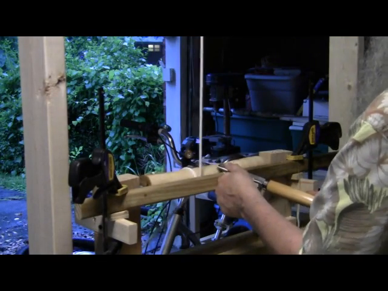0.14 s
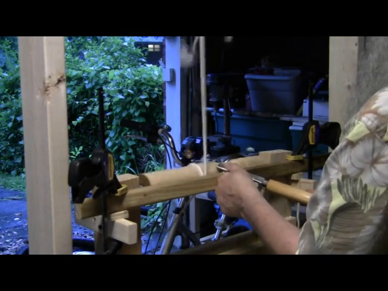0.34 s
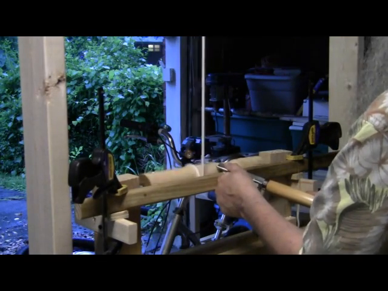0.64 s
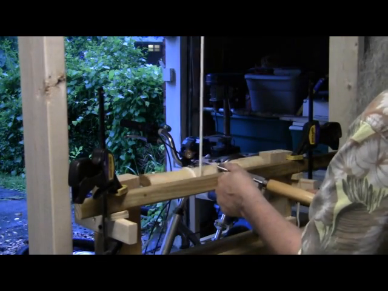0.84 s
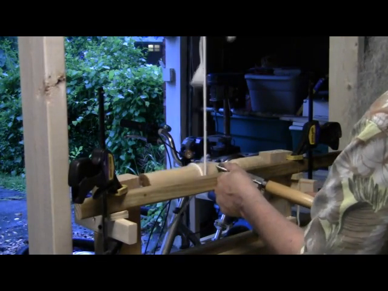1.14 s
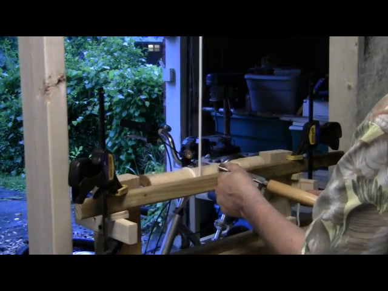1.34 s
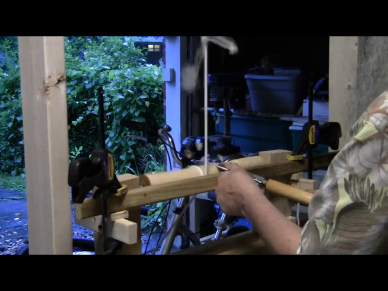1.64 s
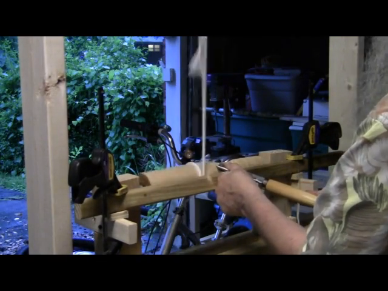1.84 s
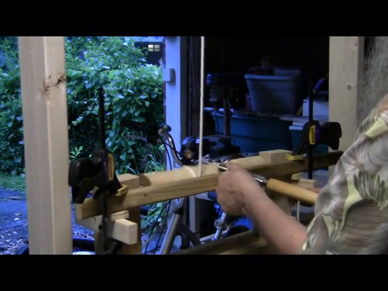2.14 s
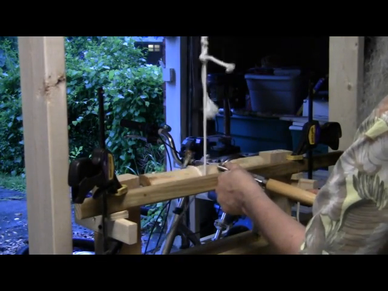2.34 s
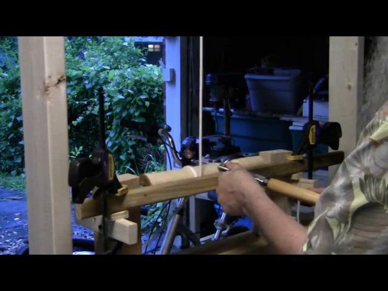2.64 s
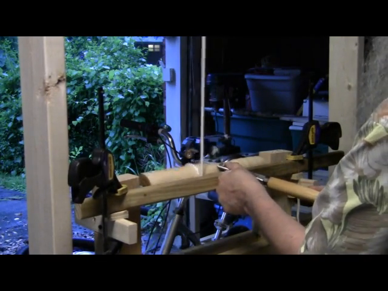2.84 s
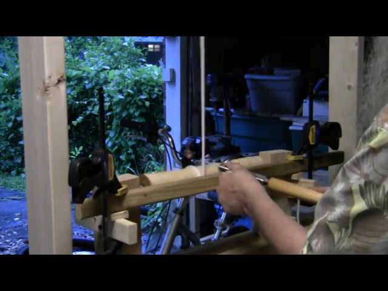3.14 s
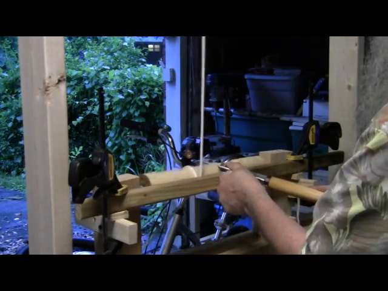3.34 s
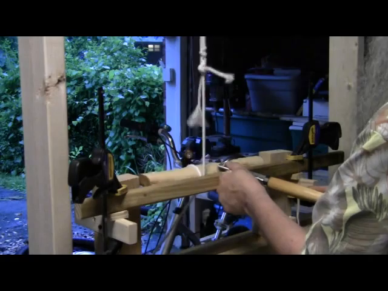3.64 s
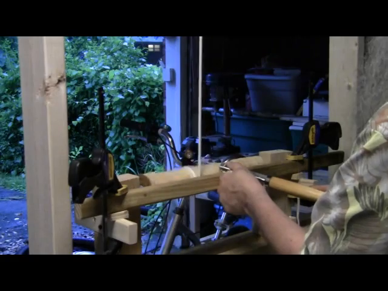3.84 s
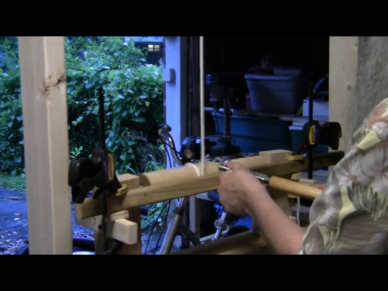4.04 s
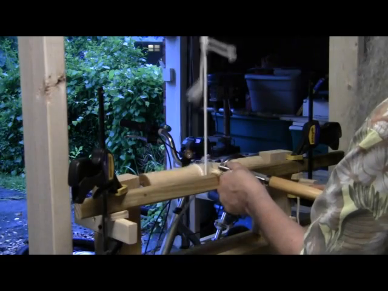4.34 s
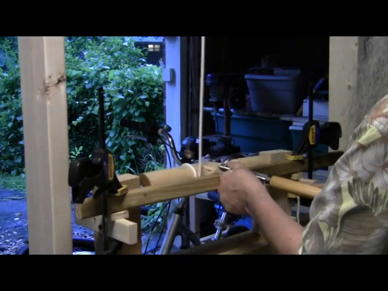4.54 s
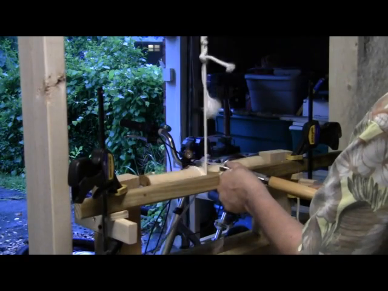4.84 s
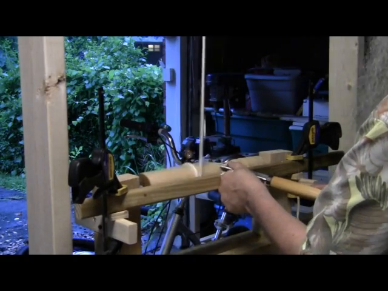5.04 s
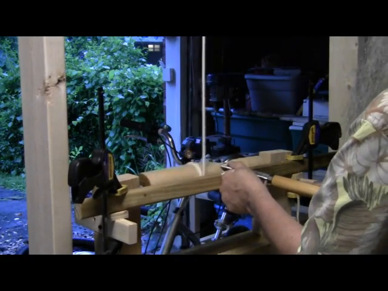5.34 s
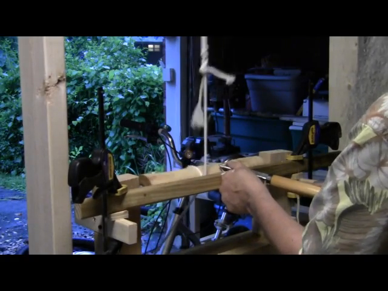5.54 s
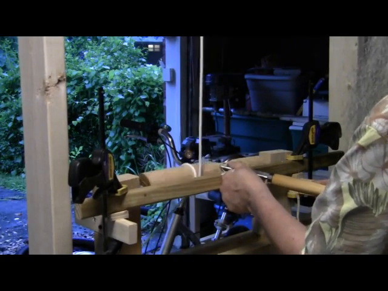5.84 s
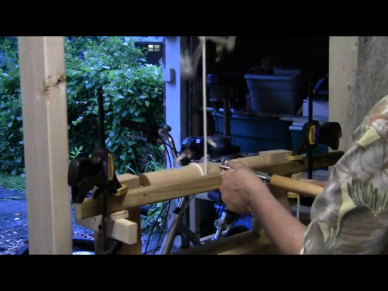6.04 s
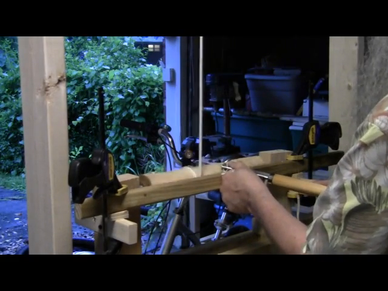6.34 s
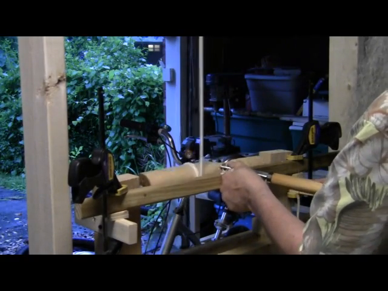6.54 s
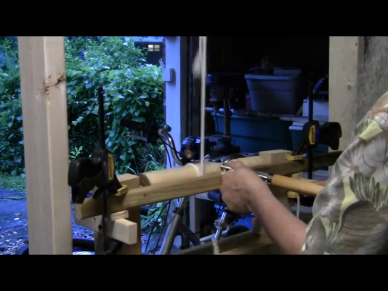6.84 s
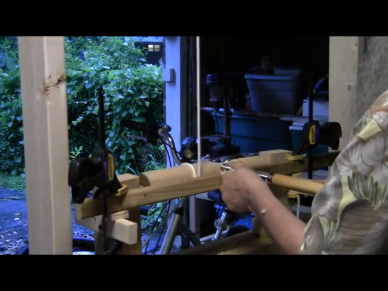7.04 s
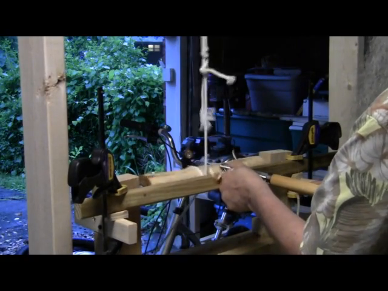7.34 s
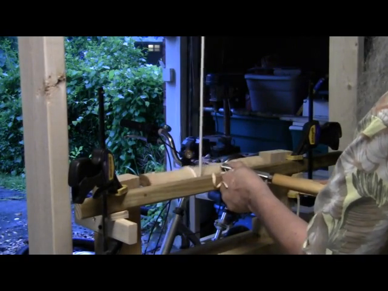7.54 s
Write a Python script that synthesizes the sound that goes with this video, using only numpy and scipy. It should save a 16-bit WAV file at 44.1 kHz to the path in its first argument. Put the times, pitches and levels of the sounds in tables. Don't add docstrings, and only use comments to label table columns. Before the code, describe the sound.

Short, woody tearing scrapes repeat about every 0.6 seconds on a cord-driven lathe, ticking and knocking between strokes, quiet yard noise behind.

```python
import sys
import numpy as np
from scipy import signal
from scipy.fft import rfft, irfft
from scipy.io import wavfile
from scipy.ndimage import uniform_filter1d

SR = 44100
rng = np.random.default_rng(int(sys.argv[2]) if len(sys.argv) > 2 else 0)


def unload_audio(sound):
    columns = np.transpose(np.atleast_2d(sound))
    steps = np.round(np.clip(columns, -1, 1) * 32767)
    wavfile.write(sys.argv[1], SR, steps.astype(np.int16))


def volts_from_db(level):
    exponent = np.asarray(level, float) / 20
    return 10 ** exponent


N = 339570

# freq_hz, density_db_per_hz
YARD_SPECTRUM = [(15, -51), (25, -42), (114, 6.5), (156, -7), (433, -5), (712, -4), (1050, -8.5),
                 (1400, -13), (1850, -12.5), (2250, -20), (2900, -22), (9010, -32.5), (12000, -37),
                 (13000, -46)]
# freq_hz, likeness
LIKENESS = [(60, 1), (230, 0.96), (870, 0.87), (3300, 0.76), (10000, 0.72), (11200, 0.13)]
# time_s, pitch_hz, level_db
MOTOR_TONE = [
    (0, 106.8, -51),
    (1, 107, -55.5),
    (2, 108, -59),
    (3.1, 106.5, -50.5),
    (4.1, 104.5, -48),
    (4.7, 104.2, -45),
    (5.5, 104.8, -47.5),
    (6, 105.3, -59.5),
    (6.5, 105.5, -46),
    (7.7, 105.9, -54),
]
# start_s, length_s, start_hz, end_hz, level_db
MOTOR_SWELLS = [(0, 4.3, 232.7, 230, -61), (4.38, .5, 228, 228, -48), (5.0, .55, 229, 229, -48),
                (5.6, .6, 230, 230, -54), (6.3, .8, 231.5, 233.5, -43), (7.15, .8, 234, 237, -47),
                (4.5, .85, 271, 270, -55), (6.15, .95, 273, 276, -51), (7.25, .6, 278, 280, -53),
                (6.75, .95, 339, 339, -48), (4.05, .9, 146, 142, -53)]
# freq_hz, t60_s
ROOM_DECAY = [(250, 0.28), (700, 0.31), (2000, 0.36), (5000, 0.39), (11000, 0.089)]

# start_s, peak_db
CORD_TICKS = [(0.1146, -35.5), (0.7352, -30), (0.756, -34), (2.0124, -35.5), (2.555, -34.5), (2.603, -33),
              (2.6429, -32), (2.667, -32), (3.2085, -33.5), (3.271, -30), (3.9039, -29), (3.929, -30.5),
              (4.5143, -29.5), (4.5439, -32), (5.0815, -34.5), (5.128, -32.5), (5.152, -33.5),
              (5.5288, -27), (6.4263, -31), (6.9426, -28.5), (7.0084, -31), (7.03, -30), (7.568, -35.5),
              (7.6299, -37)]
FAINT_CORD_TICKS = [0.1804, 1.256, 1.3344, 1.3594, 1.924, 1.957, 2.196, 4.568, 5.283, 5.482, 6.324, 6.906]
FAINT_TICK_DB = -41
# start_s, peak_db, pitch_hz
FRAME_KNOCKS = [(0.738, -29, 681), (2.012, -33, 417), (2.131, -18.5, 990), (2.17, -20, 750),
                (2.209, -32, 748), (5.483, -22, 510), (5.533, -23, 1000), (5.55, -20.5, 930),
                (5.71, -20, 587), (5.721, -30, 300), (5.737, -18.5, 308), (5.923, -45, 730),
                (5.937, -21, 324), (0.13, -23, 710), (6.944, -18, 1350), (7.163, -29, 1550)]
# start_s, peak_db, brightness_db, buzz_share
REST_TAPS = [(.624, -46, 8, .05), (.663, -45, 8, .3), (.8555, -32, 5, .25), (3.14, -41, 8, .1),
             (3.803, -42, 6, .1), (5.709, -47, 6, .3), (5.7828, -29, 1, .25), (6.2125, -33, 8, .05),
             (6.9244, -39, 8, .05), (7.085, -42, 8, .05), (7.162, -36, -8, .3), (7.225, -40, 6, .05)]
# freq_hz, width_hz, level_db, brightness_share
STEEL_MODES = [(2380, 250, -4, 0), (3500, 400, -1, 0), (5800, 700, -6, 0.83), (7300, 800, -6, 1),
               (8900, 480, -3, 1), (11000, 1900, -16, 1)]

# start_s, length_s, hiss_db, wood_start_db, wood_end_db
RETURN_STROKES = [(0.0, 0.23, -40, -40, -50), (0.689, 0.21, -38.5, -57, -34.5),
                  (1.32, 0.14, -41.5, -45, -56), (1.929, 0.3, -42.5, -55, -33.5),
                  (2.552, 0.24, -36, -41, -70), (3.172, 0.44, -41, -47, -53),
                  (3.878, 0.16, -39.5, -46, -55), (4.5, 0.26, -42, -44.5, -53),
                  (5.068, 0.89, -41.5, -44, -55), (5.749, 0.14, -35.5, -42, -61),
                  (6.312, 0.27, -43, -42.5, -56), (7.08, 0.14, -43, -48, -37),
                  (7.564, 0.22, -37.5, -40.5, -47)]
RUB_RISE_S, RUB_IN_DB, RUB_FALL_DB_PER_S = 0.099, 1, 38
# start_s, rise_s, wood_db, blade_over_wood_db, hiss_over_wood_db
EDGE_BITES = [(0.383, 0.01, -31, -5, -3.5), (0.46, 0.021, -32.5, -9.5, -8.5),
              (1.027, 0.03, -27.5, -11, -8.5), (1.114, 0.03, -25.5, -11.5, -11.5),
              (1.663, 0.028, -21.5, -15, -11), (1.736, 0.0033, -25, -9, -11.5),
              (2.311, 0.017, -29.5, -8, -0.5), (2.369, 0.027, -27, -7.5, -7.5),
              (2.908, 0.05, -18, -8, -14.5), (3.539, 0.037, -37, -5, -2), (3.599, 0.036, -30.5, -14, -9),
              (4.162, 0.036, -26, -4, -7), (4.792, 0.02, -19.5, -9.5, -9.5),
              (6.068, 0.028, -19, -13.5, -11.5), (6.685, 0.03, -27.5, -8, -6.5),
              (7.276, 0.07, -29.5, -2.5, -6)]
# start_s, rise_s, wood_db, blade_over_wood_db, hiss_over_wood_db
EDGE_SOFT_CONTACTS = [(0.942, 0.014, -42, 1, -4), (2.238, 0.018, -42, -5.5, -9), (2.84, 0.015, -48, 2.5, -3.5),
                      (4.099, 0.01, -40, -19, -11.5), (4.72, 0.051, -42.5, -12, -7), (5.516, 0.013, -46.5, -2, -3),
                      (5.876, 0.043, -38.5, -7, -14), (5.973, 0.063, -29, -10, -10),
                      (6.623, 0.011, -40, 1.5, -4.5), (6.941, 0.0053, -43, 3, -4.5), (7.225, 0.029, -43, -9, -5)]
BITE_IN_DB, GRAZE_IN_DB = 13, 12
DIES_DB, GRAZE_FALL_DB_PER_S = 27, 153
EARLY_BLADE_DB, EARLY_HISS_DB, LATE_BLADE_DB, LATE_HISS_DB = 8, 9, -4.5, -7
SETTLED_HZ = 843
# start_s, blade_main_over_others_db, shank_db, fall_db_per_s, bed_over_wood_db
HAND_GRIPS = [(0, 12, -3.5, 148, -11.5), (.9, 6, -3.5, 163, -8.5), (1.6, 4, 2, 167, -23.5),
              (2.2, 2, -1, 195, -15.5), (2.8, -12, 0, 147, -19.5), (3.5, -8, -1, 186, -20),
              (4.05, -2, 1, 130, -16.5), (4.7, -5, -1, 120.5, -22), (5.4, -6, -0.5, 120, -13),
              (6.06, -17, -4.5, 148, -21), (6.5, -6, -1.5, 110, -11), (7.2, -17, 1, 131, -14)]
# start_s, wood_region_hz, unfocused_share, upper_wood_db
SPINDLE_PLACES = [(0, 1010, 1, -5), (.9, 950, 1, -4), (1.6, 866, 0.077, 4.5), (2.2, 930, .99, -2.5),
                  (2.8, 1080, 0.33, -3), (3.5, 935, 0.98, -14), (4.05, 1090, 0.69, 7.5),
                  (4.7, 1150, 0.46, 6.5), (5.4, 810, 1, -10), (6.06, 940, 1, 4), (6.5, 920, 0.92, -0.5),
                  (7.2, 1450, .99, -0.5)]
# time_s, boost_db
GRAIN_CATCHES = [(0.387, 5.5), (0.466, 10.5), (0.491, 5.5), (.96, 1.5), (1.04, 8.5), (1.126, 6),
                 (1.151, -2.5), (1.184, -1.5), (1.678, 4.5), (1.692, 2), (1.747, 0.5), (2.328, 0),
                 (2.402, -1), (2.925, 7.5), (2.95, 2.5), (2.969, -7), (2.994, 0.5), (3.556, 7.5),
                 (3.616, 5.5), (4.175, 4.5), (4.754, 7.5), (4.826, 1), (4.937, 3.5), (6.078, 3),
                 (6.104, 2.5), (6.633, 3), (6.698, 2.5), (6.718, -2), (7.296, -0.5), (7.320, 5)]
# time_s, boost_db
SHAVING_SPITS = [(.389, 4.5), (.465, 3), (.476, 4.5), (.4894, 4), (1.0406, 0.5), (1.055, 2), (1.0685, 3),
                 (1.121, 0), (1.1288, 3), (1.1492, 2.5), (1.183, 3), (1.69, -7), (1.7435, 4), (1.7906, -1),
                 (1.757, -6), (2.3237, 0.5), (2.3839, 1), (2.912, -3), (2.9887, 2), (3.5614, 0.5),
                 (4.1707, 3.5), (4.2007, 2), (4.243, 8), (4.806, 1.5), (4.9, 5), (6.0254, 5.5), (6.09, 2),
                 (6.13, 0), (6.655, 7), (6.725, 1.5), (6.77, 5), (7.2521, 8), (7.2791, -1.5), (7.2955, 4),
                 (7.335, -6)]
# start_s, length_s, pitch_hz, level_db
EDGE_CHATTER = [(0.403, 0.015, 2260, -30.5), (0.462, .014, 2246, -32), (0.475, 0.0088, 2260, -29),
                (0.5, 0.015, 2260, -36), (0.531, .016, 2260, -35.5), (0.552, 0.026, 2260, -40.5),
                (1.154, 0.023, 2230, -33), (1.036, 0.03, 2260, -24.5), (1.669, 0.036, 2260, -20.5),
                (2.319, 0.032, 2260, -22), (2.91, 0.011, 2130, -24), (4.161, .012, 3690, -30.5),
                (4.169, 0.039, 2280, -24), (4.789, 0.01, 2430, -33), (4.799, 0.016, 1250, -26),
                (7.288, 0.013, 5250, -31.5), (7.294, 0.016, 3620, -32.5), (7.306, 0.029, 1962, -24.5)]
# start_s, length_s, pitch_hz, peak_db
SPINDLE_SURGES = [(0.394, 0.0058, 970, -18), (0.411, 0.0076, 955, -20), (0.4677, 0.0058, 855, -22),
                  (0.496, 0.0047, 880, -25), (1.039, 0.0041, 875, -18), (1.0477, 0.0068, 800, -18),
                  (1.1244, 0.0048, 886, -22), (1.132, 0.0066, 944, -19), (1.1536, 0.0096, 812, -20.5),
                  (1.6866, 0.0073, 880, -12), (1.702, 0.0041, 890, -15), (1.712, 0.0058, 836, -10),
                  (1.723, 0.0075, 893, -20), (1.755, 0.0044, 850, -21), (2.413, 0.0042, 735, -23),
                  (2.4343, 0.007, 770, -23), (2.927, 0.0098, 1100, -13.5), (2.9469, 0.0069, 1116, -6.5),
                  (2.9608, 0.0079, 1035, -14), (2.9668, 0.0039, 1067, -9), (2.988, 0.0081, 1012, -8),
                  (3.015, 0.0089, 1041, -22), (3.052, 0.0054, 947, -28), (3.6342, 0.0031, 880, -26),
                  (3.642, 0.0039, 822, -18), (4.183, 0.0042, 1080, -18), (4.2, 0.0039, 980, -23),
                  (4.8053, 0.0057, 1210, -9), (4.814, 0.0046, 1120, -19), (4.832, 0.0073, 1070, -18),
                  (4.8433, 0.007, 1100, -18), (4.8481, 0.007, 1030, -13), (4.876, 0.0038, 1043, -17),
                  (4.8958, 0.0076, 1030, -20), (6.039, 0.0034, 843, -20), (6.061, 0.0064, 734, -17),
                  (6.079, 0.0064, 821, -13), (6.0854, 0.0081, 824, -15.5), (6.1, 0.0037, 885, -10),
                  (6.1, 0.0074, 950, -14), (6.1101, 0.012, 921, -20), (6.1202, 0.0048, 910, -19),
                  (6.1255, 0.0057, 820, -10), (6.184, 0.0063, 800, -21), (6.693, 0.014, 953, -19),
                  (6.762, 0.0067, 917, -20), (7.307, 0.0047, 1249, -16), (7.3105, 0.0042, 1310, -20)]
# start_s, length_s, pitch_hz, peak_db
BED_THUMPS = [(0.413, 0.018, 295, -27), (0.507, 0.017, 249, -29), (1.063, 0.035, 276, -27),
              (1.133, 0.023, 290, -31), (1.157, 0.035, 304, -26), (1.198, 0.023, 290, -35),
              (2.408, 0.023, 304, -34), (3.009, 0.033, 276, -35), (5.932, 0.039, 340, -30),
              (6.03, 0.025, 360, -28), (6.064, 0.018, 329, -27), (6.091, 0.018, 390, -34),
              (6.114, 0.012, 400, -26), (6.709, 0.034, 286, -36), (6.755, 0.014, 278, -31),
              (6.797, 0.02, 260, -32), (7.342, 0.023, 293, -29)]

# freq_hz, width_hz, level_db
WOOD_MODES = [(427, 26, -5), (450.6, 11.7, 1.5), (542, 58, 2.5), (670, 49, 0.5), (740, 86, -3),
              (876, 54, -5.5), (932, 49, -2), (1001, 95, -2.5), (1066, 35.6, -1.5), (1116, 12, -4),
              (1234, 78, -2)]
# freq_hz, width_hz, level_db
WOOD_UPPER_MODES = [(1350, 17, 0), (1440, 33, 1.5), (1567, 20, 3), (1671, 48, 10), (1887, 220, 6.5),
                    (1920, 110, 4)]
# freq_hz, width_hz, level_db
BLADE_MAIN_MODE = [(2260, 66, 0)]
# freq_hz, width_hz, level_db
BLADE_MODES = [(2072, 120, 8.5), (2373, 43, 18), (2516, 250, 5), (2760, 29, -13)]
# freq_hz, width_hz, level_db
BLADE_HIGH_MODES = [(5040, 70, -3), (5660, 60, 11.5), (7060, 240, 1.5), (9650, 270, 6.5)]
# freq_hz, width_hz, level_db
SHANK_MODES = [(3070, 33, -20), (3570, 210, 4), (3890, 120, -3)]
# freq_hz, density_db_per_hz
TEAR_SPECTRUM = [(880, -23), (1500, 13.5), (2100, -11.5), (2270, -4.5), (2950, -13), (8980, -17),
                 (12200, -30), (13000, -38)]

# freq_hz, level_db
SCATTER_SPECTRUM = [(300, -22), (2000, -51.5), (5000, -18.5), (10000, -12), (12000, -1)]
# freq_hz, gain_db
CAPSULE_RESPONSE = [(20, -33), (45, -3), (60, 0.5), (11000, -0.5), (11700, -5), (12350, -3.5), (12550, -14)]
# freq_hz, left_over_right_db
PORT_BIAS = [(60, .4), (300, 1.9), (1100, 2.1), (2700, .8), (5900, .9), (7300, -1), (10600, -1.8),
             (12100, -7.4)]
# freq_hz, left_lead_rad
PORT_LEAD = [(300, 0), (3000, -.12), (6000, -.42), (10400, -.52), (11400, -1.6), (12100, -2.8)]


def evened(x):
    return x / np.sqrt(np.mean(x ** 2) + 1e-20)


def read(points, hz):
    f, value = np.transpose(points)
    return np.interp(np.log(hz + 1), np.log(f + 1), value)


def resonate(x, hz, width_hz):
    turn = np.exp(2j * np.pi * np.cumsum(hz * np.ones(len(x))) / SR)
    r = np.exp(-np.pi * width_hz / SR)
    return 2 * (turn * signal.lfilter([1 - r], [1, -r], x / turn)).real


def resonate_twice(x, hz, width_hz):
    return resonate(resonate(x, hz, width_hz), hz, width_hz)


def ring(x, modes):
    total = np.zeros(len(x))
    for k, (hz, width_hz, db) in enumerate(modes):
        b, a = signal.iirpeak(hz, hz / width_hz, SR)
        total += (-1) ** k * volts_from_db(db) * signal.lfilter(b, a, x)
    return evened(total)


def colour(x, db):
    return irfft(rfft(x) * volts_from_db(db), N)


def flutter(samples, depth_db):
    size = max(int(samples), 2)
    smooth = uniform_filter1d(uniform_filter1d(rng.standard_normal(N), size), size)
    return volts_from_db(depth_db * evened(smooth))


def follow(db, size, origin):
    return uniform_filter1d(volts_from_db(db), size=size, origin=origin)


def controls(tables, rest):
    t, out = np.arange(N) / SR, np.repeat(np.array(rest, float)[:, None], N, 1)
    for rows in tables:
        s, *columns = np.transpose(rows)
        on = slice(round(s[0] * SR), round(s[-1] * SR))
        out[:, on] = [np.interp(t[on], s, c) for c in columns]
    return out


def by_stroke(rows, s):
    start, *columns = np.transpose(rows)
    row = np.maximum(np.searchsorted(start, s, "right") - 1, 0)
    return [c[row] for c in columns]


def yard():
    frames, hz = N // 256 + 5, np.fft.rfftfreq(1024, 1 / SR)
    a, b, c, d, patches = rng.standard_normal((frames, 513, 5)).T
    patches = uniform_filter1d(patches, size=10, axis=0)
    patches = evened(uniform_filter1d(patches, size=16, axis=1))
    same = np.clip(read(LIKENESS, hz) - .02, -1, 1)[:, None]
    left = a + 1j * b
    z = np.array([left, same * left + np.sqrt(1 - same ** 2) * (c + 1j * d)])
    z *= volts_from_db(read(YARD_SPECTRUM, hz)[:, None] + 2.4 * patches)
    noise = signal.istft(z, nperseg=1024, noverlap=768)[1][:, :N]
    return volts_from_db(-44.0) * evened(noise)


def motor_tone(hz):
    return np.sqrt(2) * flutter(6000, 1.07) * np.sin(2 * np.pi * np.cumsum(hz) / SR)


def drone():
    t = np.arange(N) / SR
    s, hz, db = np.transpose(MOTOR_TONE)
    out = volts_from_db(np.interp(t, s, db)) * motor_tone(np.interp(t, s, hz))
    for s, length, a_hz, b_hz, db in MOTOR_SWELLS:
        swell = np.clip(np.minimum(t - s, s + length - t) / .07, 0, 1)
        out += volts_from_db(db) * swell * motor_tone(np.interp(t, [s, s + length], [a_hz, b_hz]))
    return out


def shop(x):
    echoes = np.zeros((2, SR // 2))
    at = np.arange(200, SR // 2 - 20, 20) + rng.integers(0, 20, (2, (SR // 2 - 201) // 20))
    np.put_along_axis(echoes, at, rng.choice([-1., 1.], at.shape), 1)
    hz, t, z = signal.stft(echoes, SR, nperseg=256)
    same = np.clip(read(LIKENESS, hz) - .05, -1, 1)[:, None]
    z[1] = same * z[0] + np.sqrt(1 - same ** 2) * z[1]
    decay = volts_from_db(-60 * t / read(ROOM_DECAY, hz)[:, None])
    tail = signal.istft(z * decay, SR, nperseg=256)[1]
    return signal.fftconvolve(x[None], tail / np.linalg.norm(tail[0]), axes=1)[:, :N]


def knocks():
    out, t = np.zeros(N + 4000), np.arange(4000) / SR
    shape = (1 - np.exp(-t / 0.0006)) * np.exp(-t / 0.012)
    for (s, db, hz), push in zip(FRAME_KNOCKS, rng.standard_normal((len(FRAME_KNOCKS), len(t)))):
        rattle = evened(resonate_twice(push, hz, 590)) * shape
        out[round(s * SR) - 40:][:len(t)] += volts_from_db(db - 15) * rattle
    return out[:N]


def ticks():
    out, t = np.zeros(N + 2000), np.arange(2000) / SR
    rows = CORD_TICKS + [(s, FAINT_TICK_DB) for s in FAINT_CORD_TICKS]
    grit, pitch = rng.standard_normal((len(rows), 2, len(t))), rng.uniform(0.93, 0.98, len(rows))
    chirp_shape = (t / .004) ** 1.5 * np.exp(-(t / .0055) ** 4)
    burst_shape = (1 - np.exp(-t / .0003)) * np.exp(-(t / .0045) ** 2)
    tap_shape = (t / .004) * np.exp(-(t / .007) ** 2)
    for (s, db), (fizz, push), share in zip(rows, grit, pitch):
        sweep_hz = 3100 * share + 6000 * np.exp(-t / .0015)
        chirp = np.sin(2 * np.pi * np.cumsum(sweep_hz) / SR) * chirp_shape
        burst = evened(resonate_twice(fizz, 5800, 5000)) * burst_shape
        tap = evened(resonate_twice(push, 2000, 2200)) * tap_shape
        snap = .65 * chirp + .55 * burst + .6 * tap
        out[round(s * SR) - 40:][:len(t)] += volts_from_db(db - 3.0) * snap
    return out[:N]


def taps():
    out, t = np.zeros(N + 4000), np.arange(4000) / SR
    pushes = rng.standard_normal((len(REST_TAPS), len(t)))
    for (s, db, bright_db, buzz_share), push in zip(REST_TAPS, pushes):
        buzz = push * (np.exp(-t / .002) + buzz_share * np.exp(-t / .022))
        rung = np.zeros(len(t))
        for hz, width_hz, mode_db, share in STEEL_MODES:
            gain = volts_from_db(mode_db + share * bright_db) * np.sqrt(1000 / width_hz)
            rung += gain * resonate(buzz, hz, width_hz)
        out[round(s * SR) - 10:][:len(t)] += volts_from_db(db) * rung / abs(rung).max()
    return out[:N]


def chatter():
    out = np.zeros(N)
    pushes = rng.standard_normal((len(EDGE_CHATTER), 2, 6000))
    for (s, length, hz, db), push in zip(EDGE_CHATTER, pushes):
        u = np.arange(6000) / SR / length
        wobble, throb = evened(uniform_filter1d(push, size=90))
        shape = volts_from_db(db + 2.0 + 3.1 * throb) * np.sin(np.pi * np.minimum(u, 1)) ** .5
        phase = 2 * np.pi * np.cumsum(hz * (1 + .03 * wobble)) / SR
        out[round(s * SR):][:6000] += shape * np.sin(phase)
    return out


def surges(rows):
    out, hush = np.zeros(N), np.ones(N)
    for (s, length, hz, db), turn in zip(rows, rng.random(len(rows))):
        t = np.arange(0, length, 1 / SR)
        shape = np.sin(np.pi * (t / length) ** 1.77)
        at = slice(round(s * SR), round(s * SR) + len(t))
        out[at] += volts_from_db(db - 2.5) * shape * np.sin(2 * np.pi * (hz * t + turn))
        hush[at] *= 1 - .65 * shape
    return out, hush


def returns():
    tables = []
    for s, length, db, a_db, b_db in RETURN_STROKES:
        tables.append([(s, a_db, db - RUB_IN_DB),
                       (s + RUB_RISE_S, a_db, db),
                       (s + length, b_db, db - RUB_FALL_DB_PER_S * length)])
    return controls(tables, [-120, -120])


def cuts():
    rows = sorted([(*r, True) for r in EDGE_BITES] + [(*r, False) for r in EDGE_SOFT_CONTACTS])
    next_s = [r[0] for r in rows[1:]] + [N / SR]
    tables = []
    for (s, rise, db, blade_db, hiss_db, deep), after in zip(rows, next_s):
        in_db, fall, hz = GRAZE_IN_DB, GRAZE_FALL_DB_PER_S, SETTLED_HZ
        if deep:
            in_db, fall, hz = BITE_IN_DB, by_stroke(HAND_GRIPS, s)[2], by_stroke(SPINDLE_PLACES, s)[0]
        top = min(s + rise, after - .002)
        gone = min(fall * (after - top) / DIES_DB, 1)
        soon = min(4 * gone, 1)
        tables.append([(s, db - in_db, blade_db + deep * EARLY_BLADE_DB, hiss_db + deep * EARLY_HISS_DB, hz),
                       (top, db, blade_db, hiss_db, hz),
                       (top + gone * DIES_DB / fall, db - gone * DIES_DB, blade_db + soon * LATE_BLADE_DB,
                        hiss_db + soon * LATE_HISS_DB, hz + gone * (SETTLED_HZ - hz))])
    return controls(tables, [-120, 0, 0, 900])


def catches(rows, length_s):
    t, boost_db = np.arange(N) / SR, np.zeros(N)
    for s, db in rows:
        near = slice(round(s * SR) - 800, round(s * SR) + 800)
        boost_db[near] += db * np.exp(-((t[near] - s) / length_s) ** 2)
    return volts_from_db(boost_db)


def fibres(per_s, spread_db, smooth):
    size = volts_from_db(spread_db * np.minimum(rng.exponential(1, N), 2)) * rng.choice([-1., 1.], N)
    snaps = evened(size * (rng.random(N) < per_s / SR))
    return evened(snaps + smooth * rng.standard_normal(N))


def spindle(rough, region_hz, loose, upper_db):
    wood = ring(rough, WOOD_MODES) + volts_from_db(upper_db - 2.0) * ring(rough, WOOD_UPPER_MODES)
    focused = evened(resonate_twice(wood, uniform_filter1d(region_hz, size=300), 520))
    swells, hush = surges(SPINDLE_SURGES)
    return swells, hush * (focused + loose * wood) / (1 + 0.29 * loose)


def steel_blade(rough, grip_db):
    main = ring(rough * flutter(440, 1.9), BLADE_MAIN_MODE)
    others = ring(rough, BLADE_MODES)
    return (volts_from_db(grip_db) * main + others) / np.sqrt(1 + volts_from_db(grip_db) ** 2)


def shavings(drive, rough, shank_db):
    hz = np.fft.rfftfreq(N, 1 / SR)
    tear_db = read(TEAR_SPECTRUM, hz) - 40 * np.clip(1 - hz / 2600, 0, 1)
    hiss = evened(colour(rough * flutter(580, 1.0), tear_db))
    hiss = hiss + 0.4 * ring(drive, BLADE_HIGH_MODES) + volts_from_db(shank_db - 4) * ring(rough, SHANK_MODES)
    return evened(hiss) * catches(SHAVING_SPITS, .0035)


def lathe_bed(drive, cut_db, bed_db):
    modes = [(136.0, 26, -3.5), (196.0, 39.0, -0.5), (253.0, 32.5, 0.5), (320, 56, -1.5)]
    level = volts_from_db(-53) + follow(cut_db + bed_db + 2, 3500, 1200)
    thumps, hush = surges(BED_THUMPS)
    return thumps + hush * level * ring(drive, modes)


def gouge():
    cut_db, blade_db, tear_db, region_hz = cuts()
    rub_db, rub_hiss_db = returns()
    t = np.arange(N) / SR
    grip_db, shank_db, _, bed_db = by_stroke(HAND_GRIPS, t)
    _, loose, upper_db = by_stroke(SPINDLE_PLACES, t)
    drive = fibres(3500, 3.2, 0.78) * catches(GRAIN_CATCHES, 0.0077)
    rough = drive * flutter(106, 1.3)
    swells, wood = spindle(rough, region_hz, loose, upper_db)
    blade = steel_blade(rough, grip_db)
    hiss = shavings(drive, rough, shank_db)
    cutting = follow(cut_db - 1.0, 300, 149) * wood + follow(cut_db + blade_db, 300, 149) * blade
    cutting += follow(cut_db + tear_db + 4.0, 60, 29) * hiss
    rubbing = follow(rub_db - 9.0, 60, 29) * wood
    rubbing += follow(rub_hiss_db - 15.5, 60, 29) * evened(hiss + 0.5 * blade)
    return swells + cutting + lathe_bed(drive, cut_db, bed_db) + rubbing


def scene():
    cut, small = gouge() + chatter(), ticks() + knocks() + taps()
    smear = rng.standard_normal(1200) * np.exp(-np.arange(1200) / 260)
    smeared = signal.oaconvolve(cut + small, smear / np.linalg.norm(smear))[:N]
    scattered = colour(smeared, read(SCATTER_SPECTRUM, np.fft.rfftfreq(N, 1 / SR)))
    near = cut + small + np.array([[1], [-1]]) * scattered
    return near + shop(volts_from_db(-11.0) * cut + volts_from_db(-7.0) * small) + yard() + drone()


def band_limit(x):
    return signal.sosfilt(signal.butter(12, 12520, fs=SR, output="sos"), x)


def record(dry):
    hz, sides = np.fft.rfftfreq(N, 1 / SR), np.array([[.5], [-.5]])
    gain = volts_from_db(read(CAPSULE_RESPONSE, hz) + sides * read(PORT_BIAS, hz))
    ports = gain * np.exp(1j * sides * read(PORT_LEAD, hz))
    mix = irfft(rfft(dry) * ports, N)
    return band_limit(mix)


dry = scene()
out = record(dry)
unload_audio(out)
```